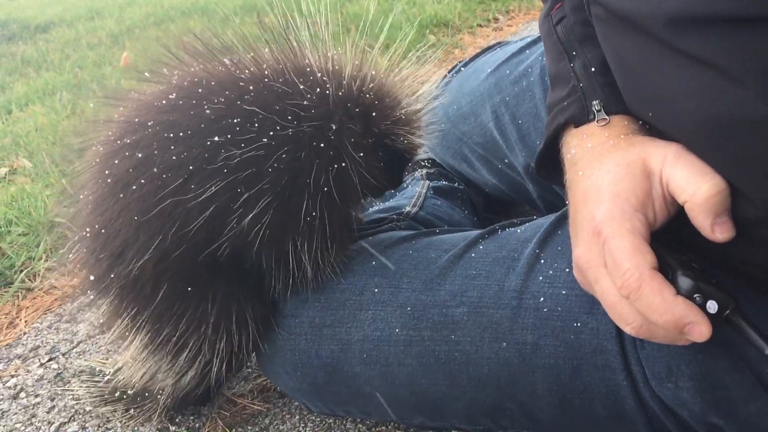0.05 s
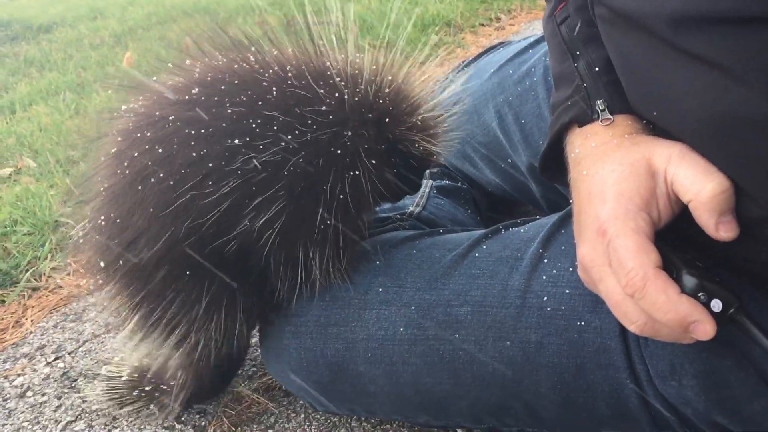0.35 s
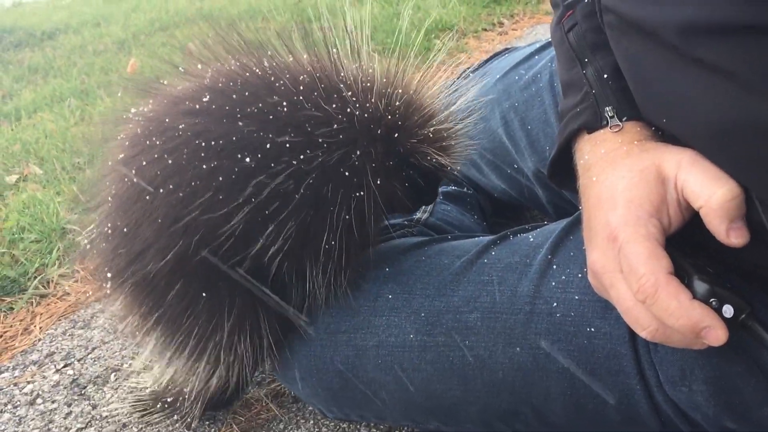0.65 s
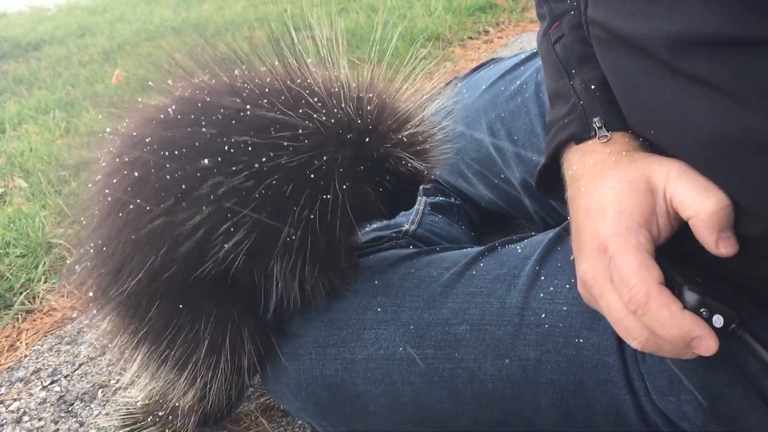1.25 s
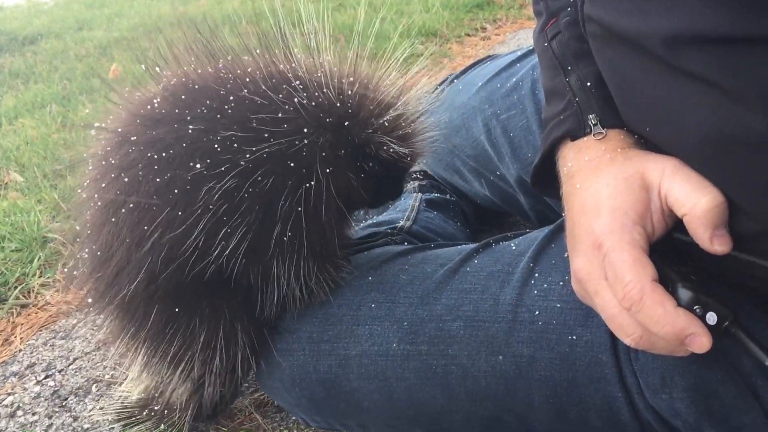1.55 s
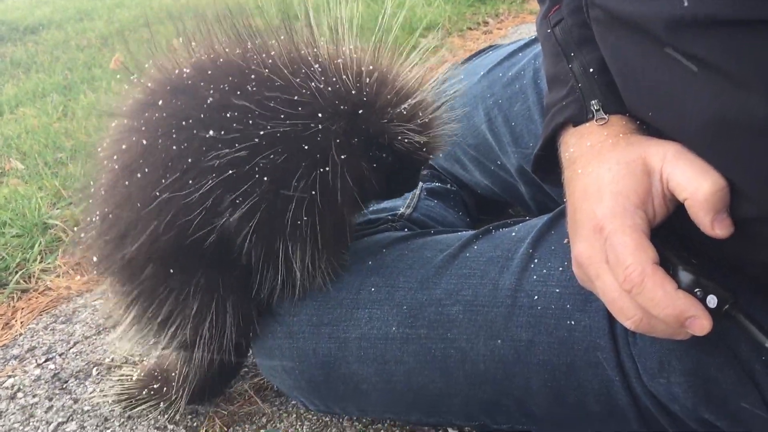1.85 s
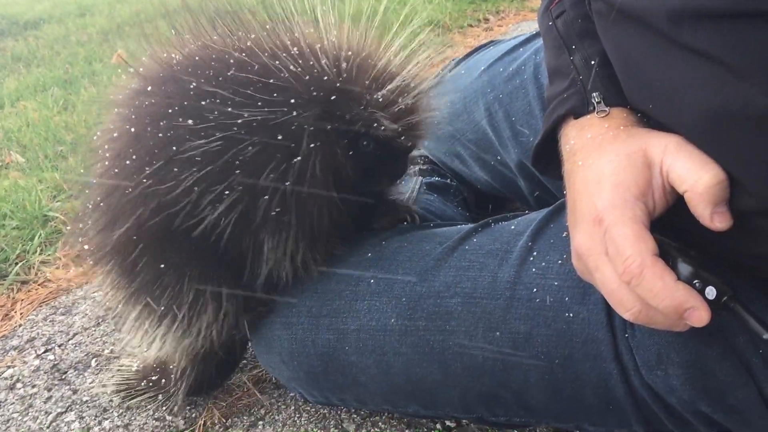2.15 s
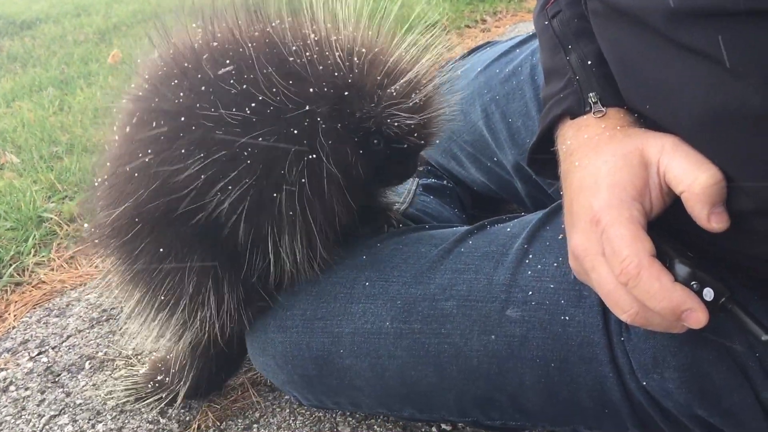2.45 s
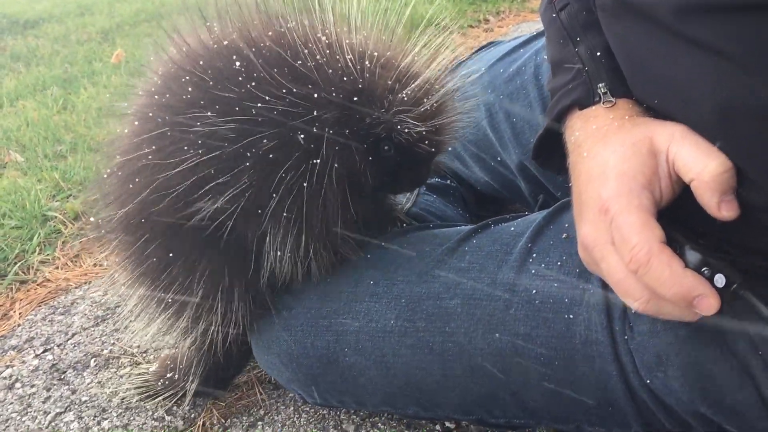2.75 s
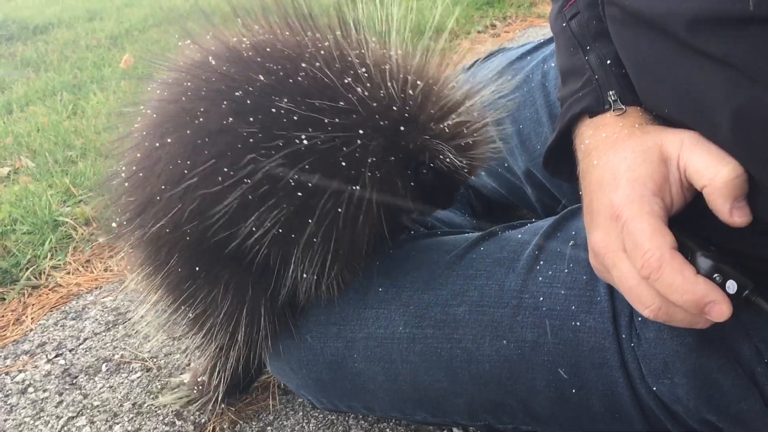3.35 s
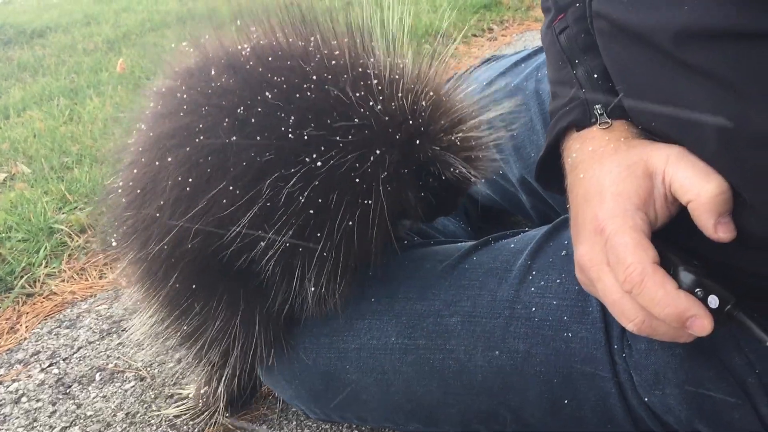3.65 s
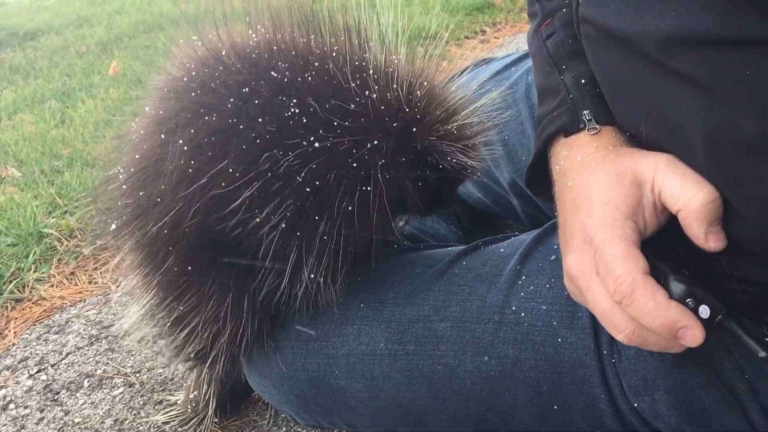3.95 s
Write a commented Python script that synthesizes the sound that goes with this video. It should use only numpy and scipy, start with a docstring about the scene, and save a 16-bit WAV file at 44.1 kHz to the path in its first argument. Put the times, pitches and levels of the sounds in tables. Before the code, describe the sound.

Wind buffets the microphone outdoors, growing stronger, with faint rustling of cloth and quills.

```python
"""A quiet hiss hangs over cold open ground. Soon swirls of air (eddies) sweep past the opening of a
bare microphone: they rumble, and single hard ones thump. Faint ticks, then rustles, of cloth and
quills sit close by. The gusts build up, and the faster the air, the higher the rumble reaches.
A few fast gusts, most of them near the end, also hum in the opening."""
import sys
import numpy as np
from scipy import signal
from scipy.fft import rfft, irfft
from scipy.io import wavfile
from scipy.ndimage import uniform_filter1d, map_coordinates

SR = 44100
rng = np.random.default_rng(int(sys.argv[2]) if len(sys.argv) > 2 else 0)


def store_pcm(level_fs):
    """Save levels as 16-bit WAV."""
    pcm = np.round(np.clip(level_fs, -1, 1) * 32767).astype(np.int16)
    wavfile.write(sys.argv[1], SR, np.atleast_2d(pcm).T)


N = 176400
TIME = np.arange(N) / SR
FREQS = np.maximum(np.fft.rfftfreq(N, 1 / SR), 1)
SHORT_TIME = (np.arange(4096) - 2048) / SR  # seconds around the middle of a short sound
SHORT_FREQS = np.maximum(np.fft.rfftfreq(len(SHORT_TIME), 1 / SR), 1)

# Tone of the outdoor hiss (frequency [Hz], relative level [dB])
HISS_TONE = [(30, -7.5), (70, 2), (130, -0.5), (200, -11), (330, -1), (450, -4.5), (620, -10.5),
             (820, -1.5), (1000, -8), (1180, -4.5), (1400, -10.5), (2000, -11), (2900, -17.5),
             (4400, -18.5), (4850, -22.5), (5300, -20.5), (6500, -22), (7600, -27), (9300, -26.5),
             (10400, -33), (11200, -30.5), (15500, -35)]
# How loud the hiss is (time [s], level [dB])
HISS_LEVELS = [(0, -65), (1.2, -64), (2, -64), (3, -63.5), (4, -63.3)]
# Wind at the opening; faster air lifts the corner, above which the rumble gets weak
# (time [s], relative level [dB], corner [Hz])
GUSTS = [(0, -65, 270.4), (.14, -65, 226.2), (.18, -53.5, 135.7), (.24, -45.5, 175.4), (.31, -69, 196),
         (.47, -64.5, 230.1), (.52, -45, 190.3), (.58, -48.5, 219.9), (.66, -70, 194.8), (.77, -73, 230.1),
         (.83, -38.5, 124.2), (.9, -65, 189.4), (.94, -41.5, 143.1), (1.05, -44, 235), (1.1, -49.5, 259.7),
         (1.15, -39.5, 200.5), (1.2, -42.5, 231.3), (1.29, -51, 215.7), (1.45, -35.5, 214.7),
         (1.55, -36, 254.2), (1.61, -31.5, 189.7), (1.67, -32.5, 254.4), (1.735, -29, 381.4),
         (1.78, -40.5, 298.7), (1.86, -28.5, 335.3), (1.93, -33, 299.7), (1.97, -35, 231.9),
         (2.06, -27.5, 355.6), (2.19, -33, 320.9), (2.24, -37, 360.2), (2.34, -31, 294.2),
         (2.41, -23.5, 411.4), (2.6, -28, 429), (2.68, -34, 314.5), (2.88, -34, 239.9), (3, -34.5, 180.1),
         (3.14, -40.5, 294.6), (3.21, -26.5, 310.7), (3.25, -30, 280.6), (3.31, -28.5, 370.4),
         (3.37, -31, 290.4), (3.42, -28.5, 386.1), (3.48, -39, 396.2), (3.54, -27.5, 448.5),
         (3.58, -32, 400), (3.66, -26.5, 333.4), (3.7, -39.5, 398.8), (3.76, -30, 539), (3.92, -29, 530),
         (4, -26, 512.3)]
# How well the opening and the microphone pass each pitch (frequency [Hz], gain [dB])
MIC_RESPONSE = [(15, -42.5), (28, -23.5), (42, -9), (60, .5), (110, 0), (190, -0.02), (320, -3), (560, 0),
                (850, 0.5), (1300, 0.5), (2500, 0.5)]
# Single hard eddies (time [s], relative level [dB], swing rate [Hz], corner of the small eddies [Hz])
THUMPS = [(.181, -41, 73.4, 130), (.232, -39, 108, 220), (0.829, -43, 69, 190), (0.939, -34, 70, 190),
          (1.04, -38, 98, 257), (1.19, -31, 135, 330), (1.535, -27, 136, 300), (1.731, -18, 189, 536),
          (1.922, -21.5, 92, 360), (2.11, -27, 127, 494), (2.199, -26, 137, 433), (2.461, -24, 137, 540),
          (2.598, -18.5, 150, 630), (3.206, -21, 94, 330), (3.416, -19, 200, 456), (3.619, -27, 193, 560),
          (3.658, -16, 66, 150), (3.958, -10, 180, 733)]
# Light taps of cloth and quills (time [s], level [dB], pitch [Hz])
TAPS = [(0.193, -71.5, 8000), (1.705, -67, 3300), (1.826, -63, 3200), (1.853, -73, 5500),
        (2.225, -54.5, 2380), (2.31, -67, 4500), (2.379, -54.5, 2200), (2.544, -63.5, 3300),
        (2.724, -60.5, 2270), (2.856, -57.5, 2600), (2.933, -61, 2800), (3.53, -60.5, 3900),
        (3.862, -63, 2520), (3.952, -61.5, 3200)]
# Strokes of rustling (start [s], length [s], relative level [dB], treble cutoff [Hz])
STROKES = [(1.237, 3.8, -71.5, 2570), (1.612, .1, -72, 4000), (1.825, 0.14, -74.5, 7000),
           (2.218, .11, -68.5, 7000), (2.835, 0.053, -64, 9000), (2.89, 0.11, -68.5, 9000),
           (2.997, .2, -79, 7000), (3.719, 0.16, -67, 3500)]
# Tone of the rustling (frequency [Hz], relative level [dB])
RUSTLE_TONE = [(500, -8), (1200, 3.5), (2300, 0), (4000, -4.5), (6500, -7), (9000, -19.5), (15000, -33)]
# Gusts that make the opening hum (start [s], length [s], level [dB])
HUM_GUSTS = [(1.718, 0.038, -38), (3.40, 0.048, -37.5), (3.52, 0.047, -34.5), (3.735, 0.087, -32),
             (3.81, 0.12, -27.5)]


def undb(db):
    """Turn decibels into a number to multiply by."""
    return 10 ** (np.asarray(db) / 20)


def unit(x):
    """Scale a signal to an average strength (rms) of 1."""
    return x / np.sqrt(np.mean(x ** 2))


def curve(table, column=1):
    """One column of a table, joined by straight lines in time."""
    rows = np.array(table)
    return np.interp(TIME, rows[:, 0], rows[:, column])


def shaped(gain, x=None):
    """Noise (or x) with the given gain at each frequency, at strength 1."""
    spectrum = rng.standard_normal(2 * len(gain)).view(complex) if x is None else rfft(x)
    return unit(irfft(spectrum * gain))


def tone(points):
    """Gain at each frequency from (frequency [Hz], level [dB]) points."""
    hz, db = np.array(points).T
    return undb(np.interp(np.log(FREQS), np.log(hz), db))


def resonance(freqs, hz, width_hz):
    """Gain that favours the frequencies near hz."""
    return 1 / (1 + ((freqs ** 2 - hz ** 2) / (freqs * width_hz)) ** 2)


def flutter(rate_hz, depth_db):
    """A gain that wavers at random."""
    wander = shaped(np.exp(-(FREQS[:len(SHORT_TIME) + 1] / rate_hz) ** 2))
    gain = unit(undb(depth_db * np.clip(wander, -2, 2)))
    return np.interp(TIME, np.linspace(0, TIME[-1], len(gain)), gain)


def swell(start, length, db, edge_s):
    """A gain that fades in, holds and fades out."""
    rise = np.clip((TIME - start) / edge_s + .5, 0, 1)
    fall = np.clip((TIME - start - length) / edge_s + .5, 0, 1)
    return undb(db) * (rise - fall)


def add(out, time, sound):
    """Mix in a short sound with its middle at the given time."""
    at = int(time * SR) + np.arange(len(sound)) - len(sound) // 2
    inside = (at >= 0) & (at < N)
    out[at[inside]] += sound[inside]


def outdoor_hiss():
    """Hiss of the open ground: the middle pitches flicker band by band, the top stays smooth."""
    hiss = shaped(tone(HISS_TONE))
    spectrum = rfft(hiss)
    for hz in 800 * 1.4 ** np.arange(4):
        band = irfft(spectrum * np.exp(-(np.log(FREQS / hz) / 0.12) ** 2), N)
        hiss = hiss + band * (flutter(rate_hz=42, depth_db=2.5) - 1)
    return hiss * undb(curve(HISS_LEVELS))


def eddies(freqs, corner_hz, steepness=5.32):
    """Pressure of swirling air: strong in the bass, falling steeply above the corner."""
    return shaped((1 + (freqs / corner_hz) ** 2) ** (-steepness / 2))


def wind_rumble(boost_db=0.5):
    """The gust carries eddies past the opening; the small ones come in bursts."""
    corner_hz = curve(GUSTS, column=2)
    mean_hz = corner_hz.mean()
    pressure = eddies(FREQS, mean_hz)
    large = signal.sosfiltfilt(signal.butter(2, mean_hz / 2, fs=SR, output="sos"), pressure)
    small = (pressure - large) * flutter(rate_hz=70, depth_db=4.5)
    travelled = np.cumsum(corner_hz) / mean_hz  # faster air brings the eddies by sooner
    passing = map_coordinates(large + small, [travelled], mode="mirror")
    power = uniform_filter1d(uniform_filter1d(passing ** 2, int(.04 * SR)), int(.045 * SR))
    steady = passing / np.sqrt(power)  # even out chance swells, so the gusts set the level
    return steady * flutter(rate_hz=35.8, depth_db=2.5) * undb(curve(GUSTS) + boost_db)


def through_microphone(pressure):
    """The opening and the microphone colour the wind and weaken its deepest bass."""
    gain = np.interp(SHORT_FREQS, FREQS, tone(MIC_RESPONSE))
    click_response = np.fft.fftshift(irfft(gain)) * np.hanning(len(SHORT_TIME))
    return signal.fftconvolve(pressure, click_response, mode="same")


def eddy_thumps(breakup_db=-9, breakup_half_cycles=1.24):
    """A hard eddy swings the pressure once and breaks up into smaller ones."""
    out = np.zeros(N)
    for time, db, swing_hz, corner_hz in THUMPS:
        cycles = SHORT_TIME * swing_hz
        swing = (1 - 2 * (np.pi * cycles) ** 2) * np.exp(-(np.pi * cycles) ** 2)
        breakup = eddies(SHORT_FREQS, corner_hz) * np.exp(-(cycles / breakup_half_cycles) ** 2)
        add(out, time, undb(db) * (swing + undb(breakup_db) * breakup))
    return out


def ticks(decay_s=0.0063):
    """Light, dry touches that die away within milliseconds."""
    out = np.zeros(N)
    decay = (SHORT_TIME >= 0) * np.exp(-abs(SHORT_TIME) / decay_s)
    for time, db, hz in TAPS:
        noise = shaped(resonance(SHORT_FREQS, hz, width_hz=0.56 * hz))
        add(out, time, undb(db) * decay * noise)
    return out


def rustles(slips_per_s=1000):
    """Cloth and quills make many tiny slips, which blur into uneven strokes."""
    slipping = rng.random(N) < slips_per_s / SR
    slip_db = -np.minimum(rng.exponential(size=N), 4)
    slips = slipping * rng.standard_normal(N) * undb(slip_db)
    scratch = shaped(tone(RUSTLE_TONE), slips) * flutter(rate_hz=80, depth_db=3)
    out = np.zeros(N)
    for start, length, db, cutoff_hz in STROKES:
        softened = signal.lfilter(*signal.butter(2, cutoff_hz, fs=SR), scratch)
        out += softened * swell(start, length, db, edge_s=0.036)
    return out


def opening_hum(hz=311.5):
    """Fast air blows across the opening and makes it ring with a broad, hollow hum."""
    treble_cut = 1 / (1 + (FREQS / (2 * hz)) ** 4)
    hum = shaped(resonance(FREQS, hz, width_hz=156) * treble_cut)
    return hum * sum(swell(start, length, db, edge_s=0.016) for start, length, db in HUM_GUSTS)


def scene():
    """Wind on the microphone and the small sounds around it, in one channel."""
    wind = through_microphone(wind_rumble() + eddy_thumps())
    return (outdoor_hiss() + wind + ticks() + rustles() + opening_hum())[None]


def record(dry, fade_s=.004, cutoff_hz=15700):
    """The sound ends with a very quick fade and loses its highest treble."""
    fade = np.clip((TIME[-1] - TIME) / fade_s, 0, 1)
    treble_cut = signal.ellip(10, .2, 70, cutoff_hz, fs=SR, output="sos")
    return signal.sosfilt(treble_cut, dry * fade)


dry = scene()
out = record(dry)
store_pcm(out)
```